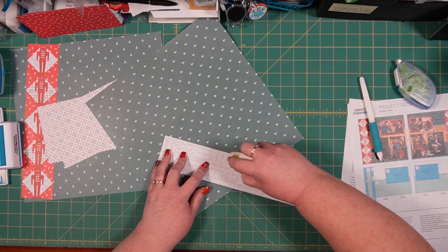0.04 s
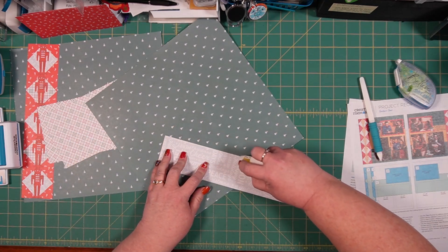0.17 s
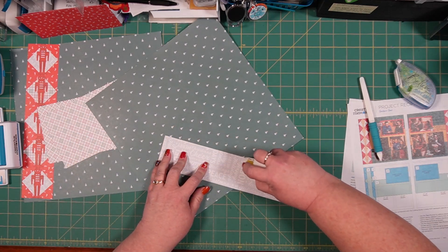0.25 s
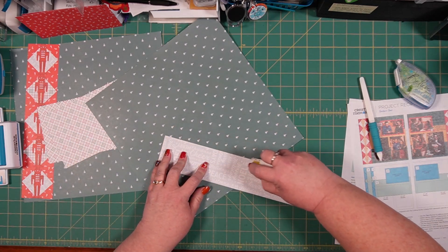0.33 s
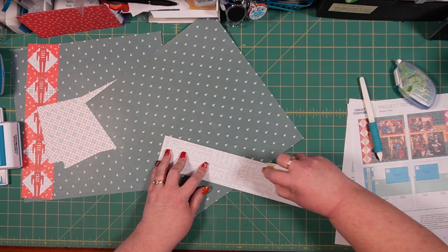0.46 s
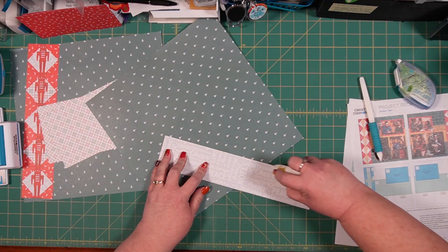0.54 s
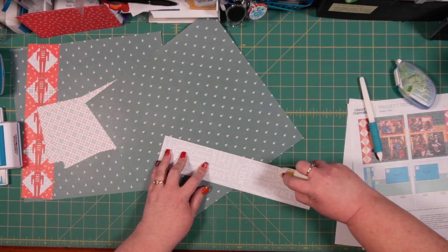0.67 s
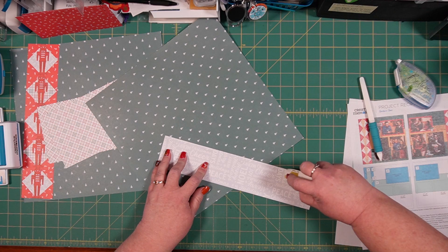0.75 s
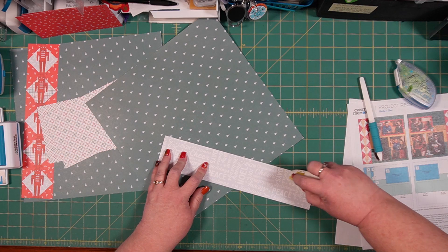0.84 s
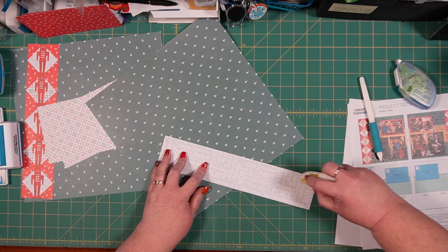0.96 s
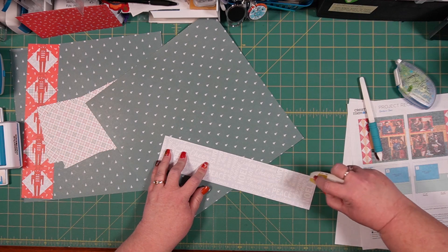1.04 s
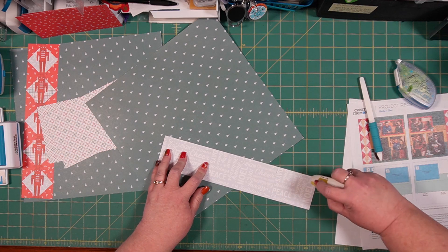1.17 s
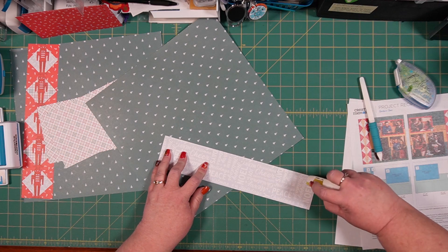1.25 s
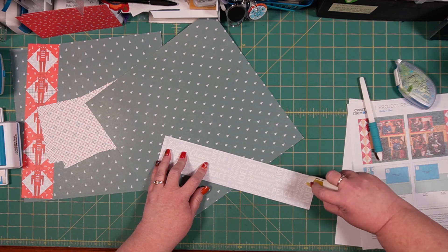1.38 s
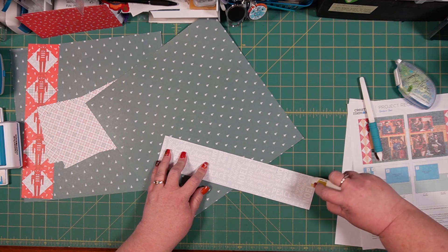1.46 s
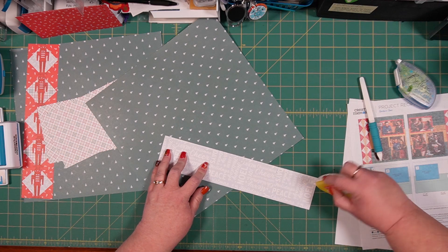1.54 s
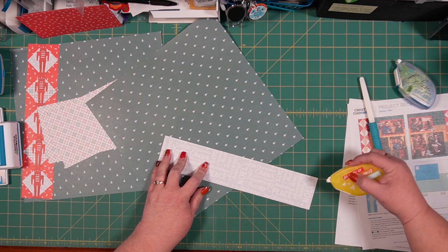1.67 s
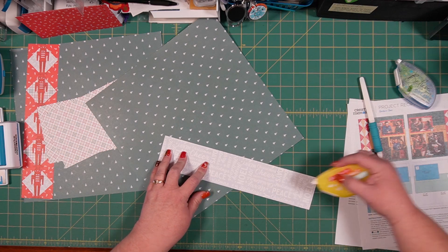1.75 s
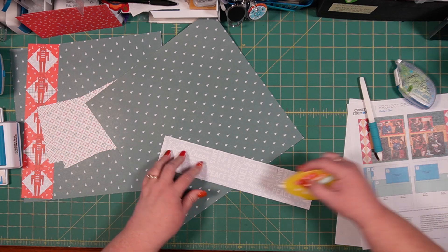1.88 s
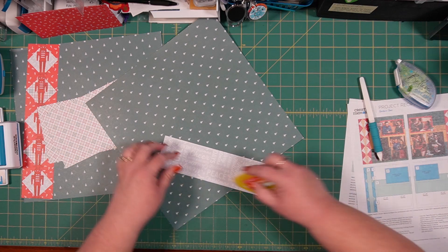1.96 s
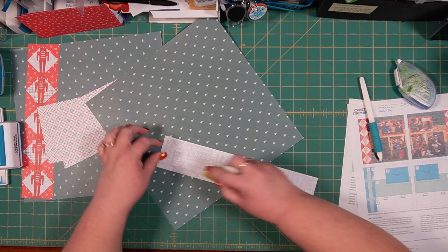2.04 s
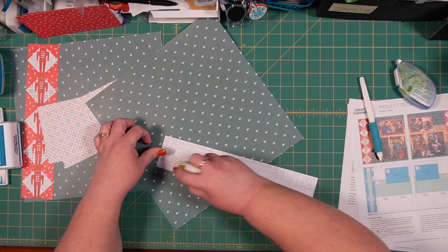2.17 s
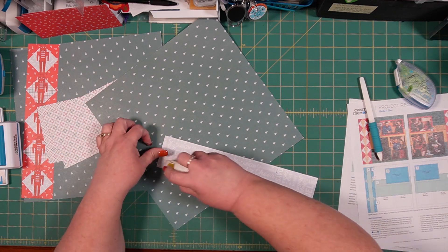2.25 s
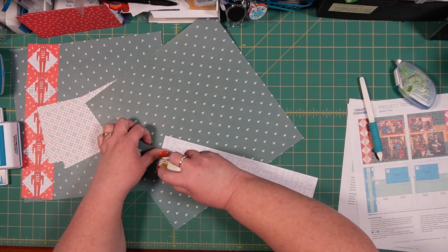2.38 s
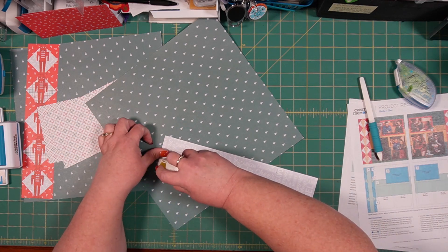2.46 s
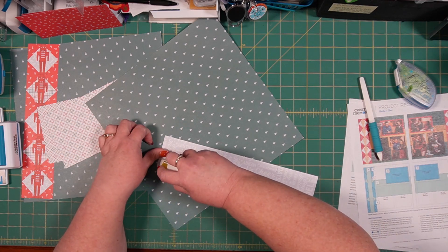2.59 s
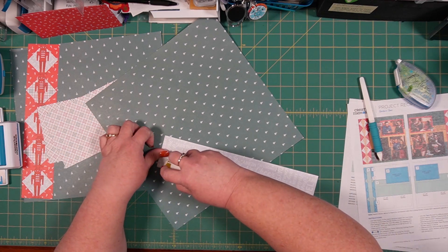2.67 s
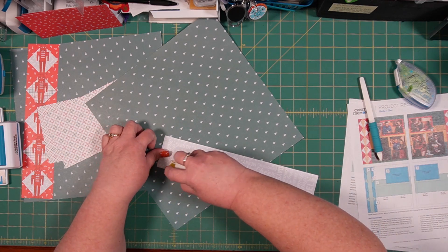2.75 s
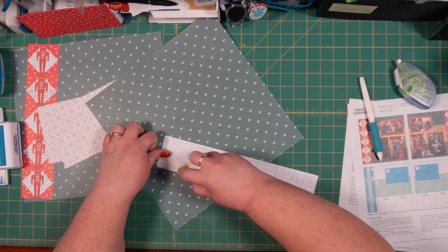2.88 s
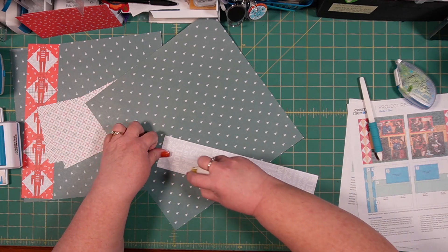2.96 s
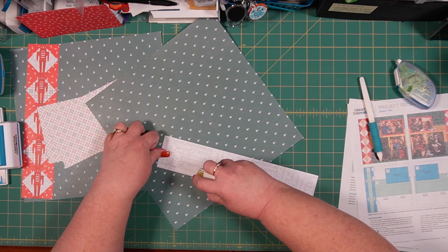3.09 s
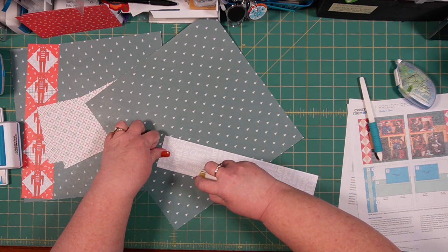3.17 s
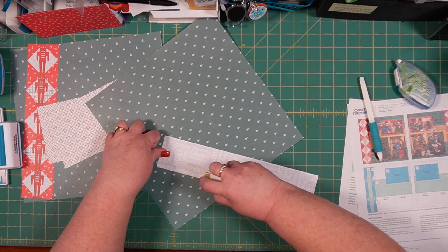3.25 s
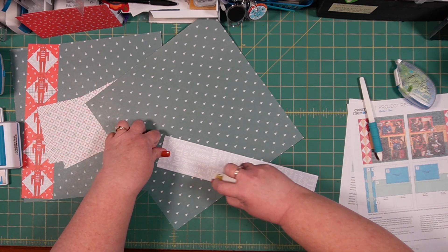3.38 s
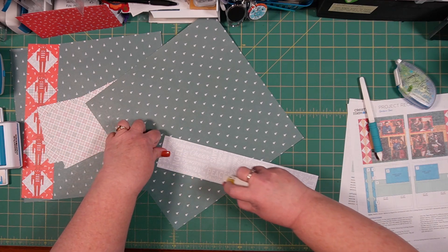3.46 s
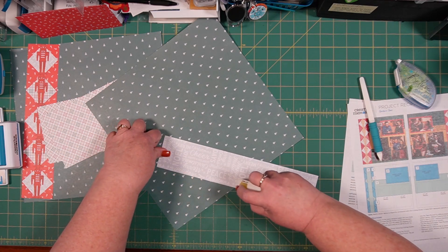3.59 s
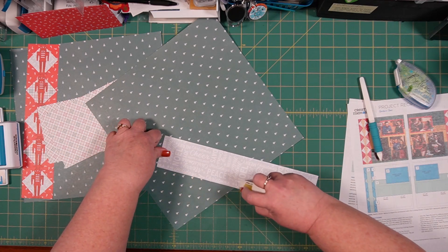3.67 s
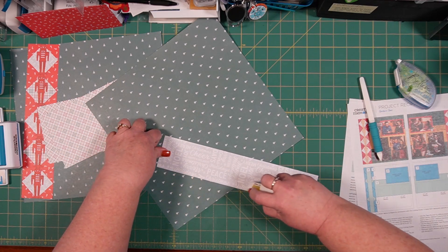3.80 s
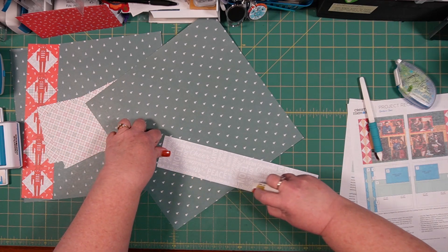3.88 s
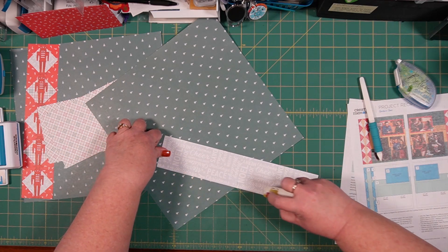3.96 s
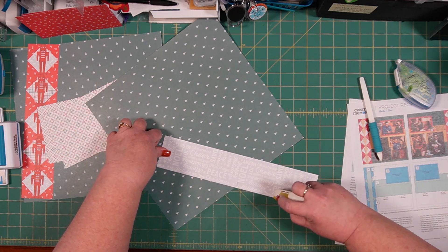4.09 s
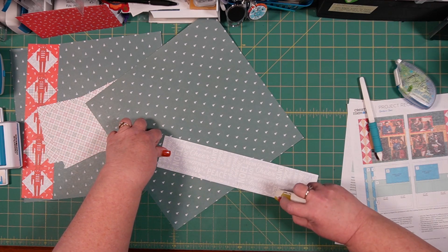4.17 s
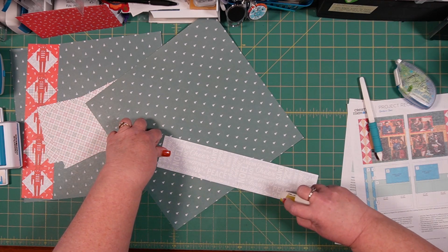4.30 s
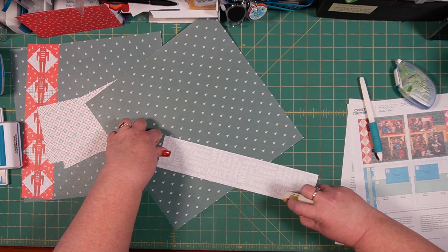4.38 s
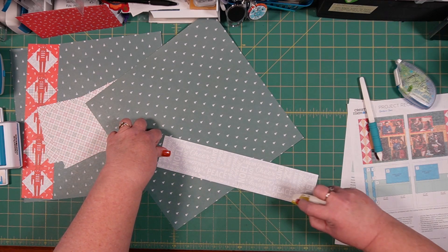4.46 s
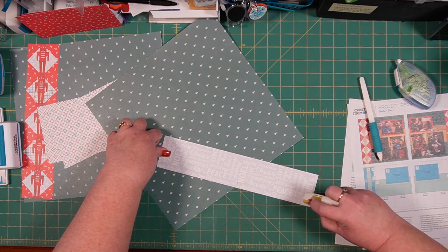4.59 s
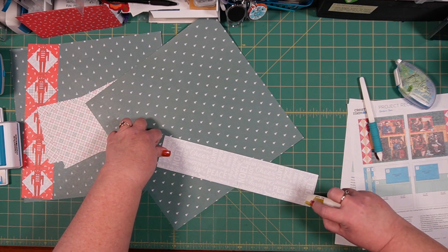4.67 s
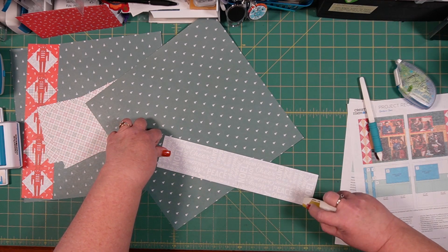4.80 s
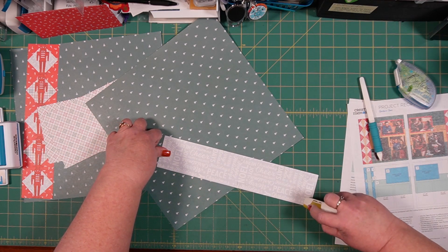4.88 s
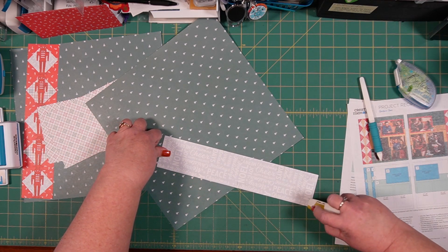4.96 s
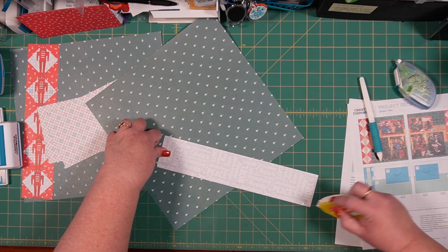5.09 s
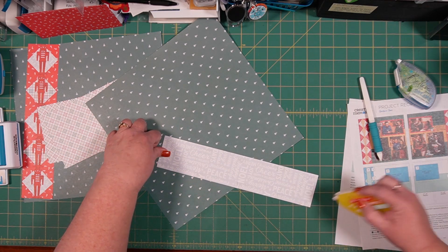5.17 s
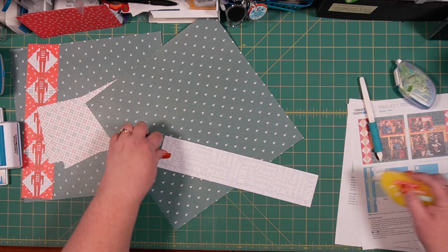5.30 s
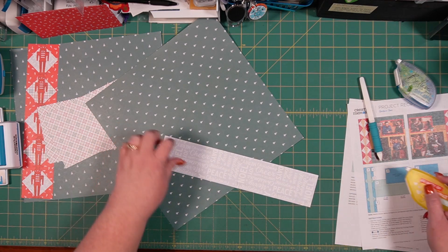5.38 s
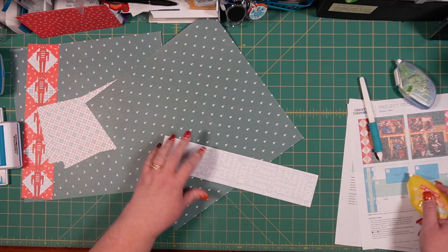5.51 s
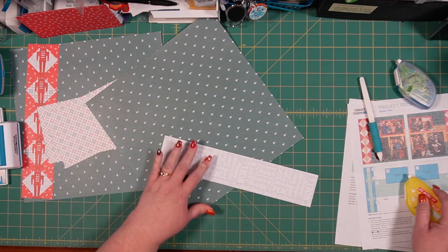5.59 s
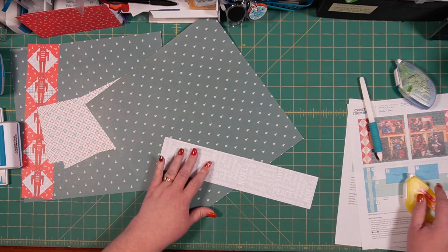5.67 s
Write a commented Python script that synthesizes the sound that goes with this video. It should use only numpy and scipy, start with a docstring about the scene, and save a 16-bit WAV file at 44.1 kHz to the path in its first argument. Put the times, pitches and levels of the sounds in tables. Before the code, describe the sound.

Short zipping bursts of clicks from an adhesive tape dispenser on paper, ending with it clattering onto a table over a faint fan hum.

```python
"""Tape runner on paper

Eight quick strokes: the tip taps down, the spool's ratchet clatters in the plastic case, the stop bumps.
The case creaks between strokes; at the end the runner is put on the table and the paper slides.
Small room with a humming fan; a limiter holds the clicks down."""
import sys
import numpy as np
from scipy import signal
from scipy.fft import rfft, irfft, next_fast_len
from scipy.io import wavfile
from scipy.ndimage import uniform_filter1d, minimum_filter1d, map_coordinates

SR = 44100
rng = np.random.default_rng(int(sys.argv[2]) if len(sys.argv) > 2 else 0)


def output_pcm(signal):
    """Save a mono or channel-first signal as 16-bit PCM at the path in sys.argv[1].

    Samples are clipped to [-1, 1] before scaling.
    """
    pcm = np.clip(np.atleast_2d(signal).T, -1, 1) * 32767
    wavfile.write(sys.argv[1], SR, np.round(pcm).astype(np.int16))


N = 253134

# strokes: start_s, stop_s, teeth, lag, ease, snap_db, swell_db, treble_db, bump_db
# lag: + slow start, - slow finish; ease: slowing at both ends
STROKE_PLAN = [(0.1993, 0.382, 26, .12, .1, -27.5, 5, 2.5, -38),
               (0.682, 0.851, 16, -.26, 0.11, -22.5, 3, 0.5, -30.5),
               (1.4247, 1.5507, 10, -0.23, 0.19, -23.5, -1.5, 1.5, -26),
               (2.654, 2.827, 15, 0, 0.067, -21.5, 0, -4, -31.5),
               (3.176, 3.325, 22, .12, .1, -23.5, 5.5, -1.5, -27),
               (3.6817, 3.857, 23, .02, .1, -22.5, -1, -0.5, -23),
               (4.2515, 4.393, 13, .1, .2, -22, -1.5, 2, -21.5),
               (4.933, 5.042, 10, .16, 0.016, -23.5, 0.5, -4, -22.5)]
# case modes set by the grip, per stroke: hollow_hz, hollow_db, rim_db, tip_hz, tip_db, spool_db
GRIP_MODES = [(1290, 9, 4.5, 3400, -7, -4), (1265, 2.5, -0.5, 5940, -5.5, -9),
              (1120, 0.5, 4, 5680, -3.5, -9), (1224, 1, -2.5, 5550, -3, -1.5), (1240, 4, 3, 5300, -28, -6),
              (1185, 1.5, -2, 5700, -6.5, -6), (1046, -0.5, 2.5, 5800, -17, -17),
              (1064, 2.5, -1, 5200, -1, 0.5)]
# tip lands before each stroke: time_s, level_db, treble_db
TIP_LANDINGS = [(0.155, -17.5, -22), (0.629, -20, -20), (1.339, -10.5, -25.5), (2.5, -14.5, -15),
                (3.051, -22, -29), (3.642, -19.5, -18), (4.159, -25, -23), (4.846, -9.5, -25)]
# paper friction spectrum: freq_hz, gain_db
PAPER_SPECTRUM = [(300, 7.5), (1200, -2), (3500, -0.5), (6000, -7.5), (10000, -11.5), (16000, -23)]
# table top response: freq_hz, gain_db
TABLE_SPECTRUM = [(25, -50), (65, -1), (140, 3.5), (220, -6.5), (500, -24), (1500, -80)]


def ratchet(life_s=0.0031, jitter_s=0.0002, level_db=7, scatter_db=2.8, alike=0.43, size=4096):
    """The pawl snaps off each tooth as tape turns the spool; each snap rings the case."""
    out = np.zeros(N)
    hz = np.fft.rfftfreq(size, 1 / SR)
    for run, grip in zip(tooth_snaps(), GRIP_MODES):
        hollow_hz, hollow_db, rim_db, tip_hz, tip_db, spool_db = grip
        held = [(hollow_hz, 150, hollow_db), (3720, 210, rim_db),
                (tip_hz, 500, tip_db), (10150, 450, spool_db)]
        body = causal(case_gain(hz, held, ring_db=9))
        pawl = rng.standard_normal(size)  # common to one stroke's snaps
        for time_s, db, treble_db in run:
            late, strong, stretch_db = rng.standard_normal(3)
            grain = np.sqrt(alike) * pawl + np.sqrt(1 - alike) * rng.standard_normal(size)
            envelope = spray(life_s * amp(stretch_db), rise_s=0.00013)
            snap = amp(db + level_db + scatter_db * strong) * grain * envelope
            ringing = irfft(rfft(snap) * body * causal(shelf(hz, treble_db + 1)))
            add(out, time_s + jitter_s * late, ringing)
    return out


def tooth_snaps(arch_db=2, dulling_db=3.5):
    """Per stroke, rows of time_s, level_db, treble_db: slips, then the run, pressed harder midway."""
    # single teeth slip before the spool runs: time_s, level_db, treble_db
    slips = [(.181, -46, 8), (.19, -23, -40), (0.6513, -28.5, 5.5), (2.6135, -22, -3), (2.633, -18, -5.5),
             (3.1114, -25.5, 3), (3.123, -32.5, 1), (3.1457, -26, 1.5), (3.155, -28, -4)]
    runs, previous_stop_s = [], 0
    for start_s, stop_s, teeth, lag, ease, db, swell_db, treble_db, _ in STROKE_PLAN:
        times_s = tooth_times(start_s, stop_s, teeth, lag, ease)
        u = np.linspace(-.5, .5, len(times_s))
        level_db = db + swell_db * u + arch_db * (np.cos(np.pi * u) - .5)
        level_db[0] += 2  # tape breaks free
        level_db[-1] -= 4  # pawl barely clears the last tooth
        lead_in = [slip for slip in slips if previous_stop_s < slip[0] < start_s]
        runs.append(lead_in + list(zip(times_s, level_db, treble_db - dulling_db * u)))
        previous_stop_s = stop_s
    return runs


def tooth_times(start_s, stop_s, teeth, lag, ease):
    """When each tooth passes the pawl as the hand speeds up and slows."""
    u = np.linspace(0, 1, round(teeth) + 1)
    elapsed = u + lag * u * (1 - u) + ease * np.sin(2 * np.pi * u) / (2 * np.pi)
    return start_s + (stop_s - start_s) * elapsed


def case_gain(hz, held, ring_db):
    """Direct snap plus ringing shell; held adds modes: freq_hz, width_hz, gain_db."""
    # one tooth's snap: freq_hz, gain_db
    snap_spectrum = [(100, -15.5), (400, -10), (900, -1.5), (1550, -12), (2400, 9), (3700, -10.5),
                     (4200, -5.5), (5700, -1.5), (7200, -8.5), (8500, -5.5), (10200, -5), (12500, -7),
                     (15500, -3)]
    # plastic shell: freq_hz, width_hz, gain_db
    shell_modes = [(665, 60, -10), (895, 80, -7), (1880, 100, -7), (2320, 170, 3), (2600, 240, -4),
                   (3250, 220, -3), (7200, 500, -11), (14800, 1100, -14)]
    return np.hypot(amp(along(snap_spectrum, hz)), amp(ring_db) * resonances(shell_modes + held, hz))


def bumps(level_db=-1, rebound_s=0.0087, loss_db=5):
    """Stops and landings ring the hollow case and rim; the spool rocks back and knocks twice more."""
    out = np.zeros(N)
    stops = [(stop_s, db, 1100, 13) for _, stop_s, *_, db in STROKE_PLAN]
    landings = [(s, db - 18, grip[0], 0) for (s, db, _), grip in zip(TIP_LANDINGS, GRIP_MODES)]
    for time_s, db, hollow_hz, rim_db in stops + landings:
        held = [(hollow_hz, 140, 7), (3850, 130, rim_db)]
        colour = lambda hz: causal(case_gain(hz, held, ring_db=12) * shelf(hz, -10))
        for k in range(3):
            bump = filtered(burst(0.0069, rise_s=0.00063), colour)
            add(out, time_s + k * rebound_s, amp(db + level_db - k * loss_db) * bump)
    return out


def roller(rub_db=-48, rumble_db=-44, peel_db=-37, usual_teeth_per_s=110):
    """The tip rubs, the roller rumbles on the table, the tape crackles louder as it peels faster."""
    rub = amp(rub_db) * contact(lead_s=0.081) * noise(PAPER_SPECTRUM)
    rumble = amp(rumble_db + wobble(25)) * contact(lead_s=0) * noise(TABLE_SPECTRUM)
    crackle = rng.standard_normal(N) * amp(4 * wobble(900))
    held = [(1200, 1400, 1), (3700, 430, 1)]
    peel = unit(filtered(crackle, lambda hz: causal(case_gain(hz, held, ring_db=40))))
    return rub + rumble + amp(peel_db) * tape_speed() / usual_teeth_per_s * peel


def contact(lead_s, fade_s=0.016):
    """Gate for the moving tip; starts opening lead_s before the spool runs."""
    return sum(curve([(start_s - lead_s, 0), (start_s + fade_s, 1),
                      (stop_s - fade_s, 1), (stop_s + fade_s, 0)])
               for start_s, stop_s, *_ in STROKE_PLAN)


def tape_speed():
    """Teeth per second, smoothed over 10 ms by the hand's inertia."""
    runs = [tooth_times(*stroke[:5]) for stroke in STROKE_PLAN]
    travel = sum(np.interp(np.arange(N) / SR, times_s, np.arange(len(times_s))) for times_s in runs)
    return np.abs(uniform_filter1d(np.gradient(travel) * SR, 441))


def taps_and_creaks(shell_db=-13):
    """Landings and creaks ring the case faintly, each at its own spot, and thump the table."""
    # case creaks in the hand: time_s, level_db
    creaks = [(.492, -20), (1.738, -19), (1.906, -19), (2.035, -17.5), (3.409, -15), (4.908, -16),
              (5.192, -14)]
    faint_creaks = [(s, -30) for s in rng.uniform(0, N / SR, 8)]
    touches = [(s, db, 2.5, treble_db + 12) for s, db, treble_db in TIP_LANDINGS]
    touches += [(s, db, -9, -18) for s, db in creaks + faint_creaks]
    held = [(1300, 1000, 0.81), (3600, 2700, 0.99)]
    shell, thumps = np.zeros((2, N))
    for time_s, db, thump_db, treble_db in touches:
        spot = 1 + 0.008 * rng.standard_normal()
        colour = lambda hz: causal(case_gain(hz * spot, held, ring_db=6) * shelf(hz, treble_db))
        add(shell, time_s, amp(db + shell_db) * filtered(burst(0.0033, rise_s=0.000062), colour))
        add(thumps, time_s, amp(db + thump_db) * burst(0.0063))
    return shell + shaped(thumps, TABLE_SPECTRUM)


def knocks(ring_db=5, crack_db=-22, thump_db=-19):
    """The runner is laid down: each contact cracks, thumps and rings hollow."""
    # runner hits the table: time_s, level_db, hardness_db
    hits = [(5.564, -17, 9), (5.570, 2, 12), (5.616, -20, -18), (5.678, -22, -10), (5.702, -10, 11),
            (5.7084, 6.5, -25), (5.723, -29, -16), (5.738, -9, -2)]
    # hollow ring: freq_hz, width_hz, gain_db
    knock_modes = [(676, 70, -12), (916, 130, -1.5), (1015, 19, 7), (1120, 74, 7.5), (1420, 210, -5),
                   (2450, 230, -7.5), (3580, 350, -10.5), (4660, 270, -17.5)]
    # low thump: freq_hz, gain_db
    thump_spectrum = [(30, -22), (70, -8), (140, 8), (230, 2.5), (350, 6), (600, -7), (1500, -58)]
    blows, cracks, thumps = np.zeros((3, N))
    for time_s, db, hardness_db in hits:
        add(blows, time_s, amp(db + ring_db) * burst(0.0033))
        add(cracks, time_s, amp(db + hardness_db + crack_db) * burst(0.0011))
        add(thumps, time_s, amp(db + thump_db) * burst(0.0091))
    hollow = filtered(blows, lambda hz: causal(resonances(knock_modes, hz)))
    crack = filtered(cracks, lambda hz: causal(shelf(hz, -6) * shelf(hz, -9, corner_hz=11000)))
    return hollow + crack + shaped(thumps, thump_spectrum)


def hands():
    """Nails tick on the paper, which hisses as it slides."""
    # fingernail ticks: time_s, level_db
    nail_ticks = [(.617, -39), (2.331, -38.5), (2.37, -38.5), (4.772, -40), (5.4061, -24), (5.6657, -28.5)]
    # hands and paper slide: start_s, length_s, level_db
    slides = [(1.7, .26, -52), (1.88, .34, -49.5), (2.16, .34, -54), (5.21, .12, -53), (5.655, .12, -39.5)]
    # thin tick: freq_hz, gain_db
    tick_spectrum = [(1000, -9), (3800, -0.5), (4900, 14), (8000, -1.5), (16000, -7)]
    ticks, sliding = np.zeros((2, N))
    for time_s, db in nail_ticks:
        add(ticks, time_s, amp(db) * burst(0.002))
    for start_s, length_s, db in slides:
        add(sliding, start_s, amp(db) * np.sin(np.linspace(0, np.pi, round(length_s * SR))))
    hiss = sliding * amp(wobble(65)) * noise(PAPER_SPECTRUM)
    return shaped(ticks, tick_spectrum) + hiss


def room(x, early_db=-9, tail_db=-17, early_t60_s=0.075, gap_s=0.004, blocks=20):
    """Near surfaces reflect, then the walls; a new pattern per block stands for the moving hand."""
    # wall decay: freq_hz, t60_s
    decay = [(200, 0.18), (1200, 0.23), (3500, 0.23), (8000, 0.27), (15000, 0.018)]
    out = np.zeros(N)
    edges = np.linspace(0, N, blocks + 1).astype(int)
    for a, b in zip(edges, edges[1:]):
        hz, t, z = signal.stft(rng.standard_normal((2, SR // 3)), SR, nperseg=256)
        walls = signal.istft(z[0] * amp(-60 * t / along(decay, hz)[:, None]), SR, nperseg=256)[1]
        near = signal.istft(z[1] * amp(-60 * t / early_t60_s), SR, nperseg=256)[1]
        tail = amp(tail_db) * walls / np.linalg.norm(walls)
        early = amp(early_db) * near / np.linalg.norm(near)
        add(out, a / SR + gap_s, signal.fftconvolve(x[a:b], early + tail))
    return filtered(out, lambda hz: shelf(hz, -6))


def fan(air_db=-48, drone_db=-56, waver_db=2.06):
    """Steady air, droning ducts and the whine of a slowly sinking shaft speed."""
    # shaft speed: time_s, speed_hz
    shaft = [(0, 59.7), (2.4, 58), (4.2, 58.1), (5.74, 56.8)]
    # whine: shaft_multiple, level_db
    partials = [(7, -59.5), (8, -50.5), (23, -63), (31, -65.5)]
    # ducts: freq_hz, width_hz, gain_db
    duct_modes = [(132, 19, -5), (1480, 49, -15)]
    # moving air: freq_hz, gain_db
    air_spectrum = [(25, -51), (45, -14), (64, -3.5), (100, -14), (160, 1), (250, -8.5), (450, -10.5),
                    (720, -10), (1150, -9), (1800, -14.5), (2700, -22), (3400, -18.5), (5800, -28.5),
                    (15800, -33.5)]
    turns = np.cumsum(curve(shaft) + 0.06 * wobble(4.64)) / SR
    whine = sum(amp(db + waver_db * wobble(4.02)) * unit(np.sin(2 * np.pi * k * turns))
                for k, db in partials)
    drone = unit(filtered(rng.standard_normal(N), lambda hz: resonances(duct_modes, hz)))
    return amp(air_db) * noise(air_spectrum) + whine + amp(drone_db) * drone


def spray(life_s, rise_s, size=4096):
    """Envelope of a spray of tiny impacts."""
    t = np.arange(size) / SR
    return np.exp(-(t / life_s) ** 2) * (1 - np.exp(-t / rise_s))


def burst(life_s, rise_s=0.0001, size=4096):
    """Fresh noise under a spray envelope."""
    return rng.standard_normal(size) * spray(life_s, rise_s, size)


def noise(spectrum):
    """Noise of rms 1 with this spectrum."""
    return unit(filtered(rng.standard_normal(N), lambda hz: amp(along(spectrum, hz))))


def wobble(rate_hz):
    """Smooth random curve, rate_hz knots a second."""
    knots = rng.standard_normal(int(N * rate_hz / SR) + 4)
    return map_coordinates(knots, [np.arange(N) * rate_hz / SR])


def resonances(modes, hz):
    """Power-summed gain of modes: freq_hz, width_hz, gain_db."""
    return np.sqrt(sum(np.abs(amp(db) * hz * width / (f * f - hz * hz + 1j * hz * width)) ** 2
                       for f, width, db in modes))


def shelf(hz, treble_db, corner_hz=4500):
    """Treble shelf gain."""
    return amp(treble_db / (1 + (corner_hz / (hz + 1)) ** 4))


def causal(gain):
    """Minimum-phase response with this gain."""
    cepstrum = irfft(np.log(np.maximum(gain, 1e-6)))
    half = len(cepstrum) // 2
    cepstrum[1:half] *= 2
    cepstrum[half + 1:] = 0
    return np.exp(rfft(cepstrum))


def filtered(x, response):
    """Apply response(hz) by FFT."""
    size = 2 * next_fast_len(len(x) // 2 + 4096)
    return irfft(rfft(x, size) * response(np.fft.rfftfreq(size, 1 / SR)), size)[:len(x)]


def shaped(x, spectrum):
    """Minimum-phase filter from rows of freq_hz, gain_db."""
    return filtered(x, lambda hz: causal(amp(along(spectrum, hz))))


def along(points, hz):
    """Interpolate rows of freq_hz, value on a log axis."""
    freq_hz, values = np.transpose(points)
    return np.interp(np.log(hz + 1), np.log(freq_hz + 1), values)


def curve(rows):
    """Rows of time_s, value as one value per sample."""
    return np.interp(np.arange(N) / SR, *np.transpose(rows))


def add(track, time_s, x):
    """Mix x into the track."""
    i = int(np.clip(round(time_s * SR), 0, len(track)))
    track[i:i + len(x)] += x[:len(track) - i]


def amp(db):
    """Decibels to gain."""
    return 10 ** (np.asarray(db) / 20)


def unit(x):
    """Scale to rms 1."""
    return x / np.sqrt(np.mean(np.abs(x) ** 2) + 1e-20)


def scene():
    """Work on the table, its room and the fan; mono."""
    work = ratchet() + bumps() + roller() + taps_and_creaks() + knocks() + hands()
    return (work + room(work) + fan())[None]


def record(dry, ceiling_db=-9, window_samples=45, top_hz=16000):
    """Fast peak limiter, then a steep low-pass."""
    needed_gain = np.minimum(1, amp(ceiling_db) / (np.abs(dry[0]) + 1e-9))
    gain = uniform_filter1d(minimum_filter1d(needed_gain, window_samples), window_samples)
    return filtered(dry[0] * gain, lambda hz: 1 / (1 + (hz / top_hz) ** 120))[None]


dry = scene()
out = record(dry)
output_pcm(out)
```